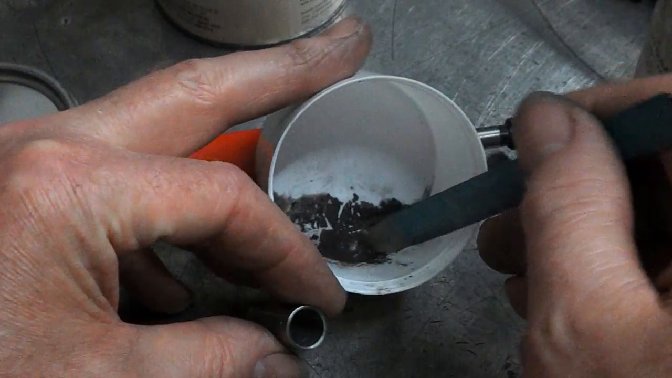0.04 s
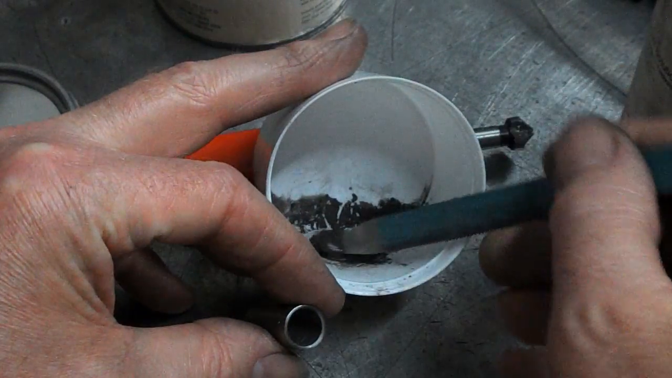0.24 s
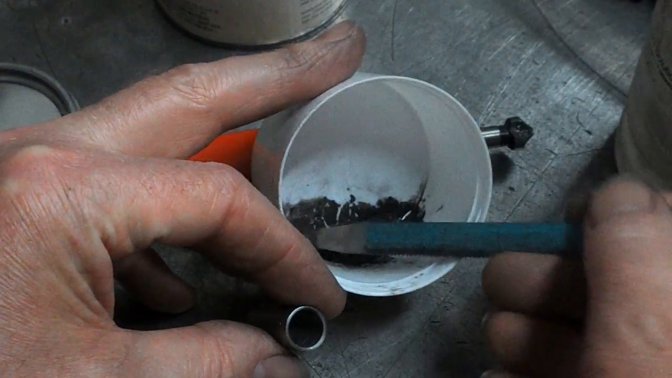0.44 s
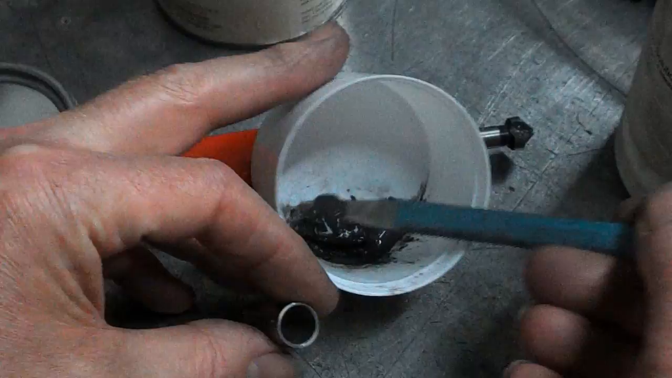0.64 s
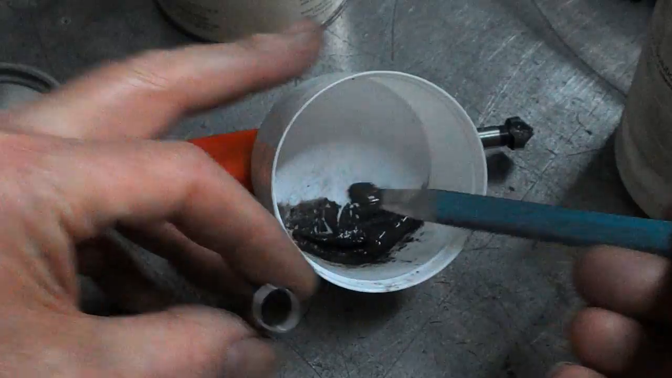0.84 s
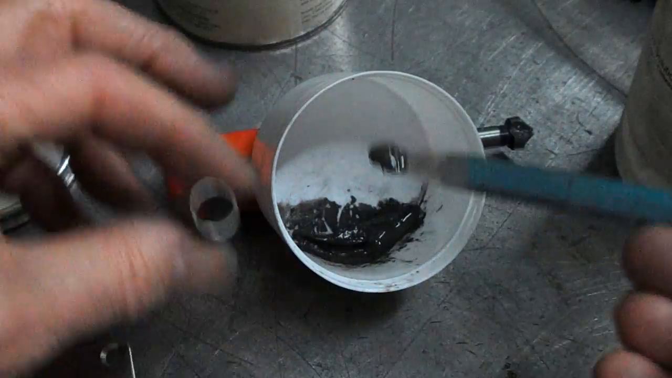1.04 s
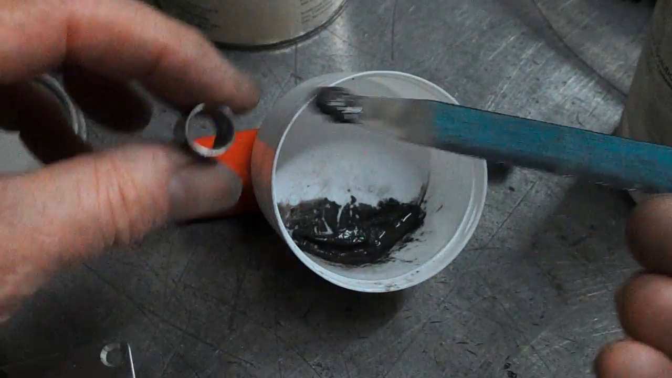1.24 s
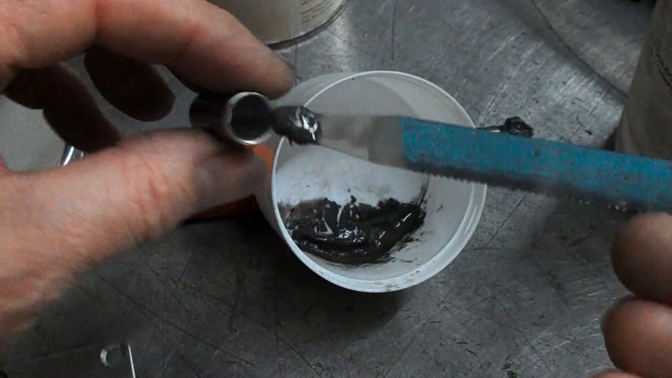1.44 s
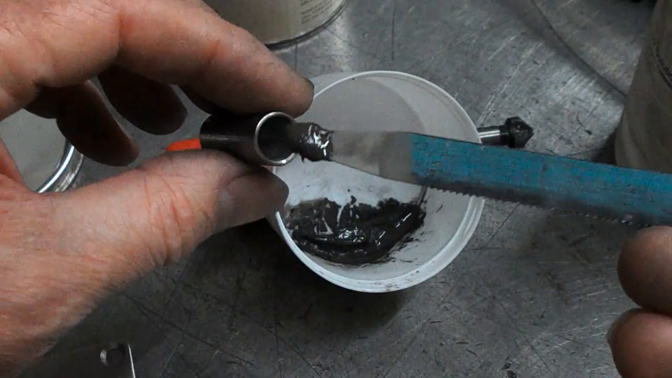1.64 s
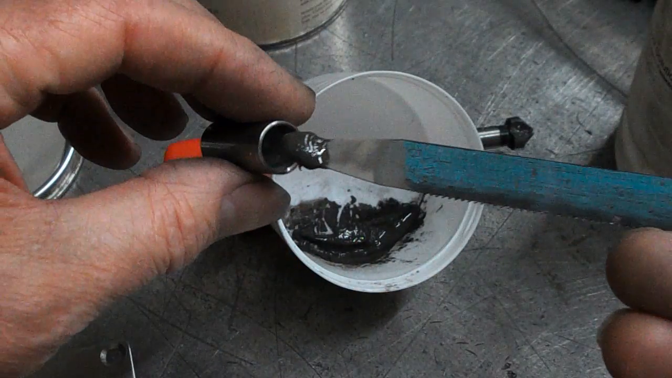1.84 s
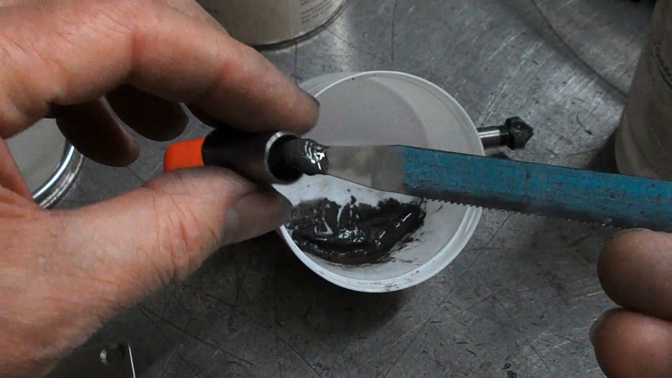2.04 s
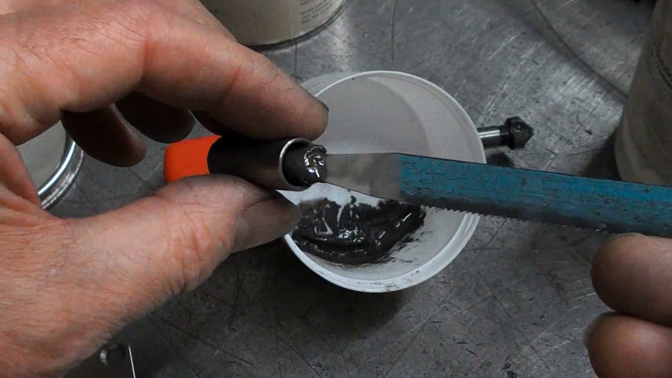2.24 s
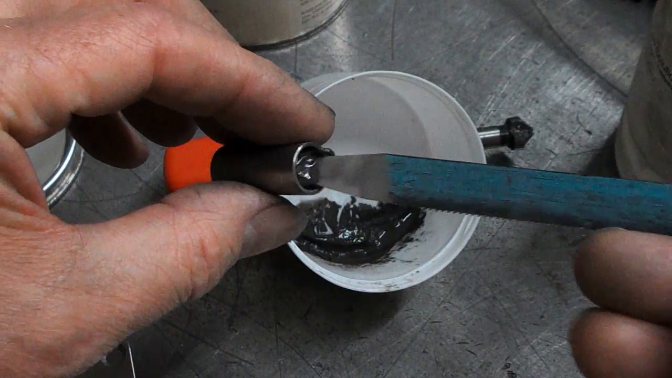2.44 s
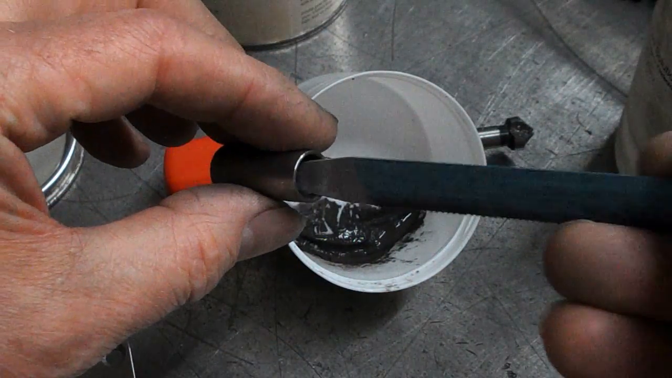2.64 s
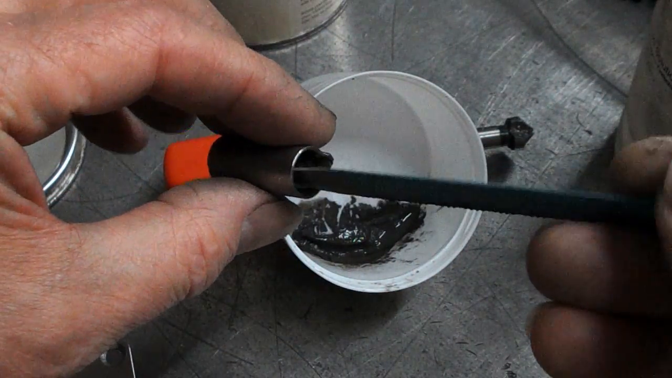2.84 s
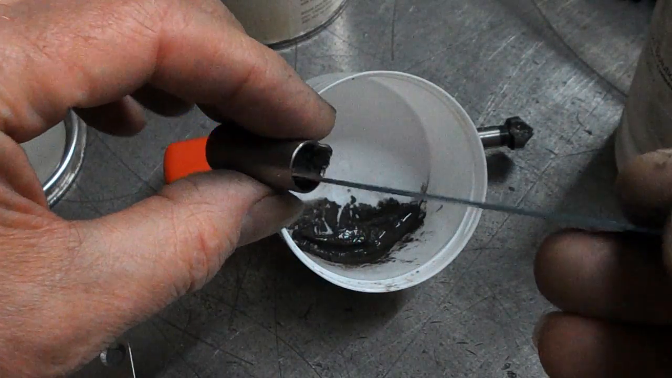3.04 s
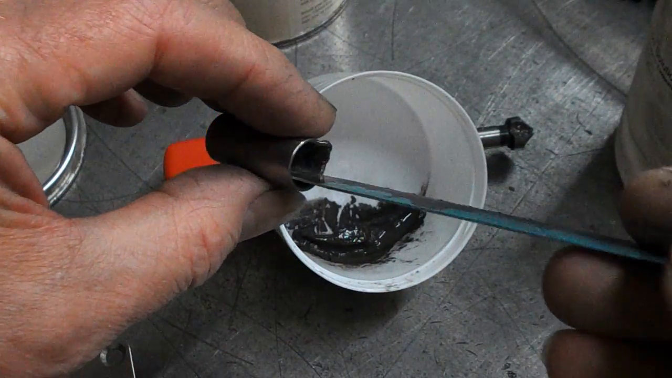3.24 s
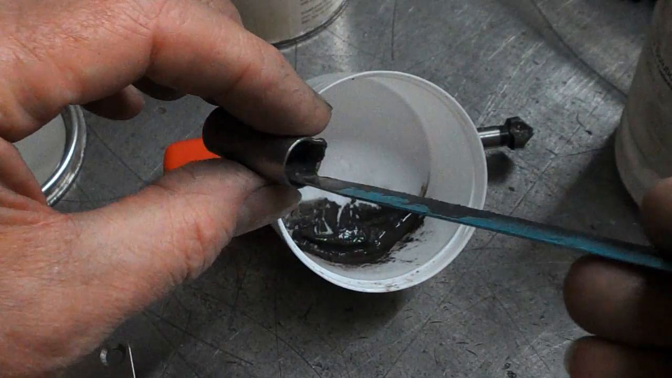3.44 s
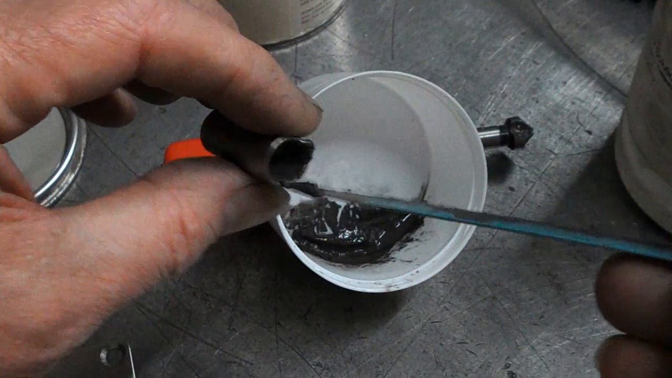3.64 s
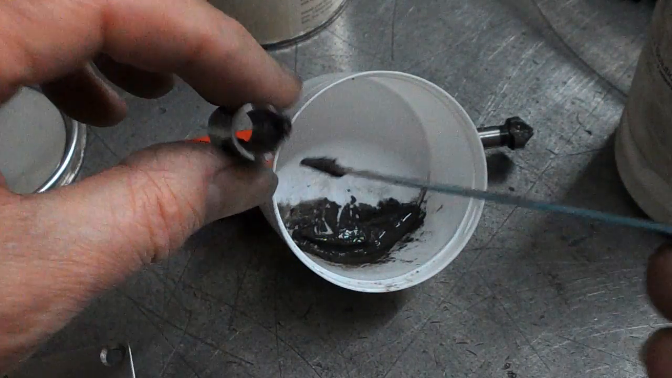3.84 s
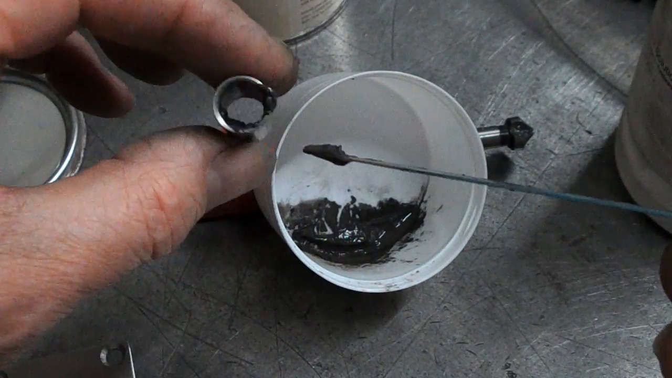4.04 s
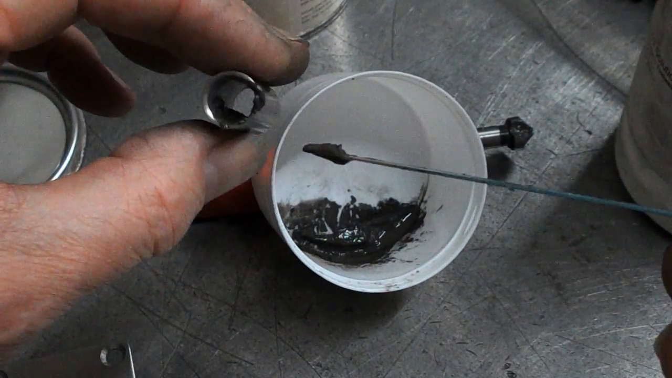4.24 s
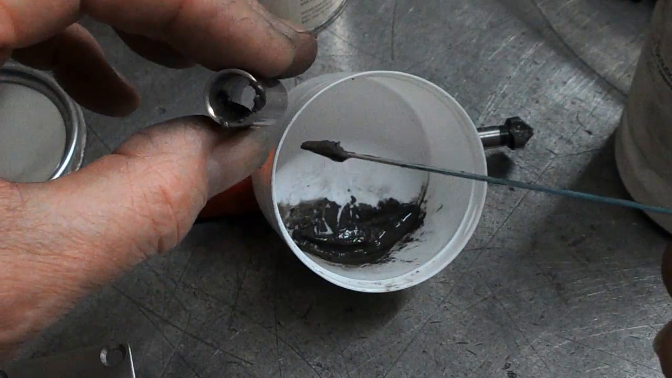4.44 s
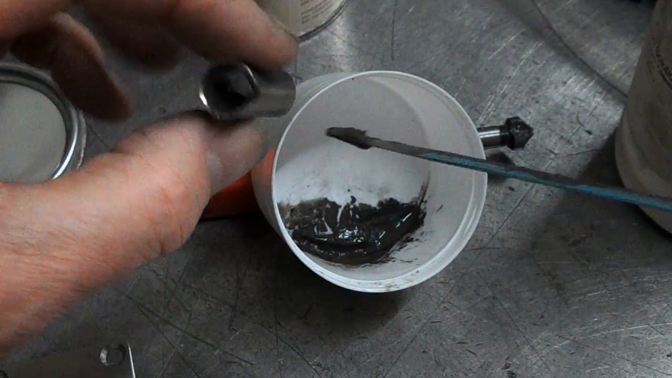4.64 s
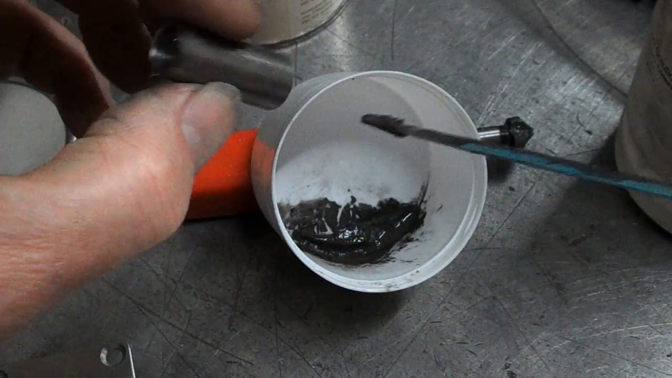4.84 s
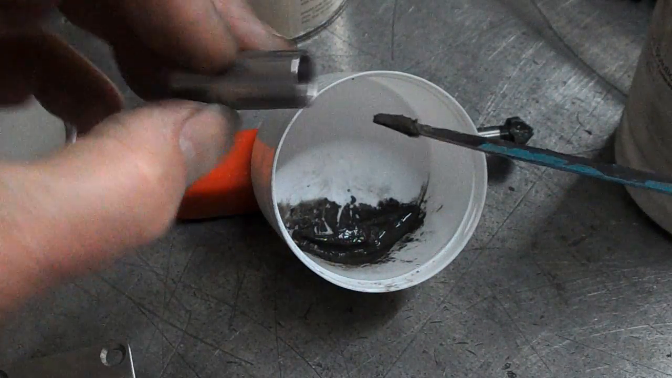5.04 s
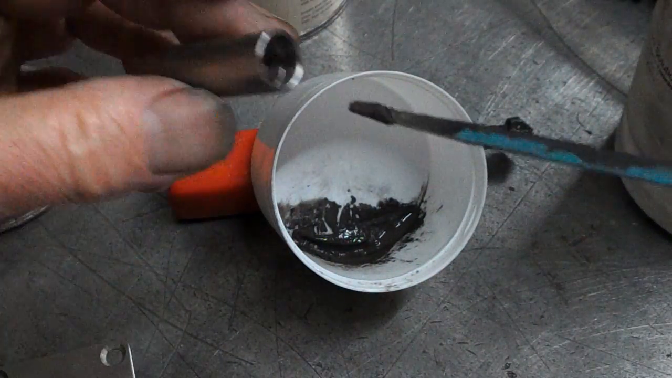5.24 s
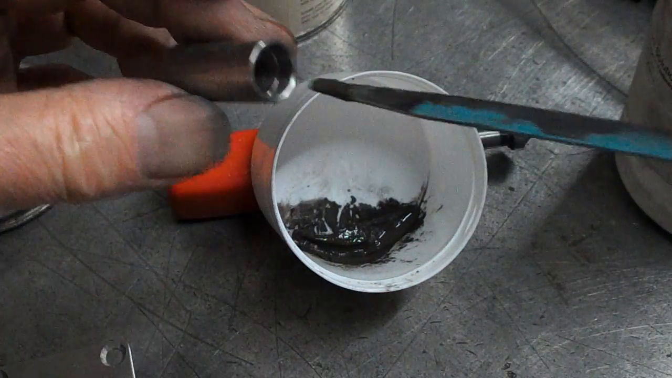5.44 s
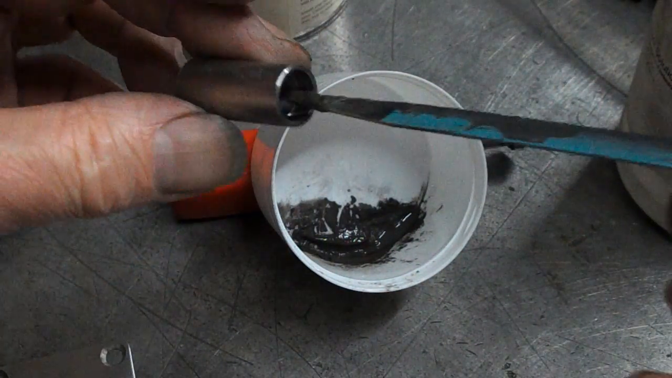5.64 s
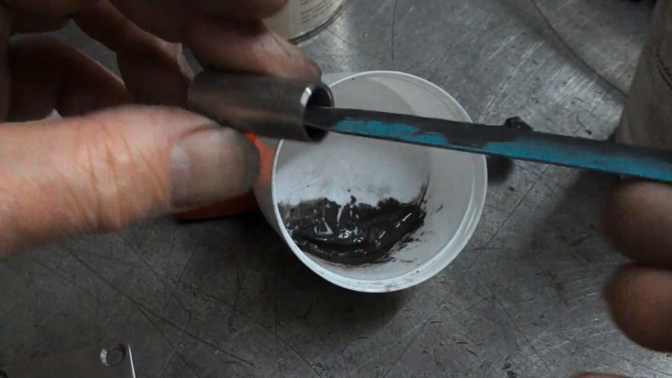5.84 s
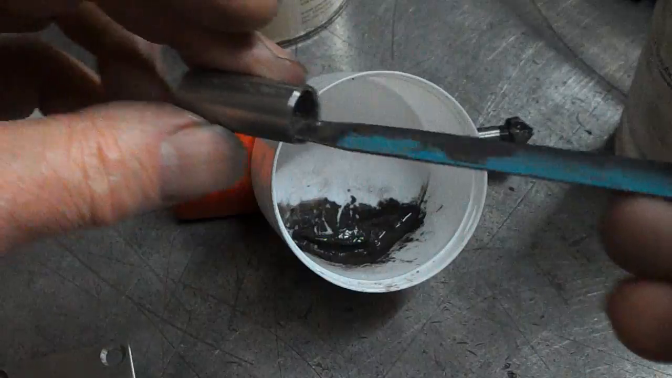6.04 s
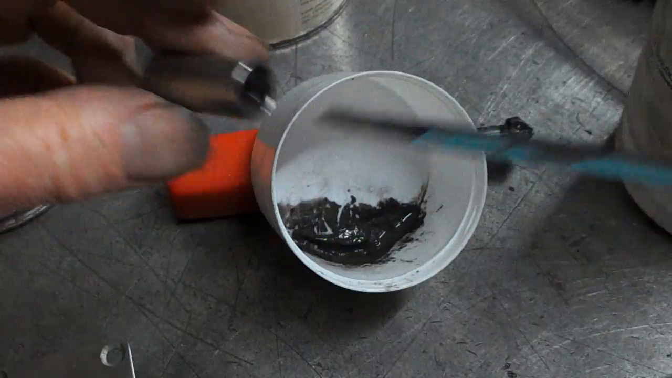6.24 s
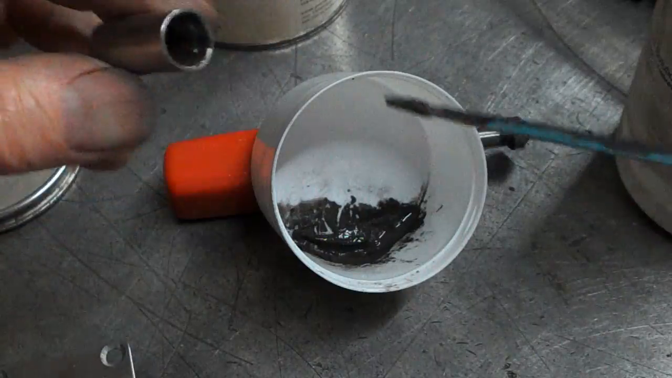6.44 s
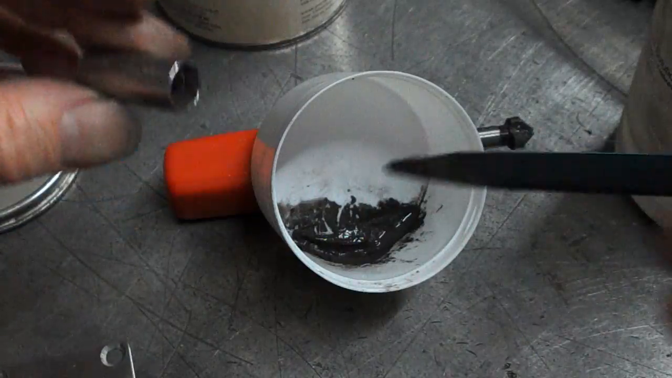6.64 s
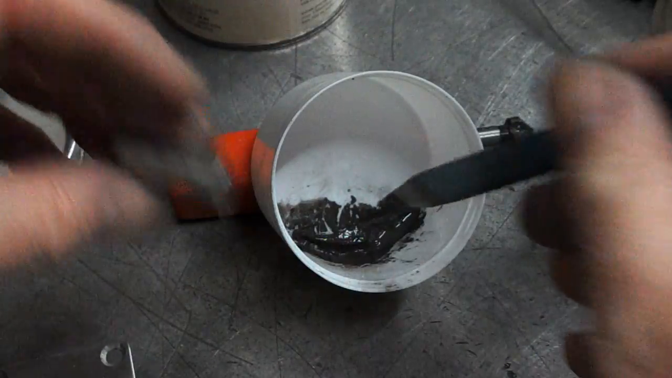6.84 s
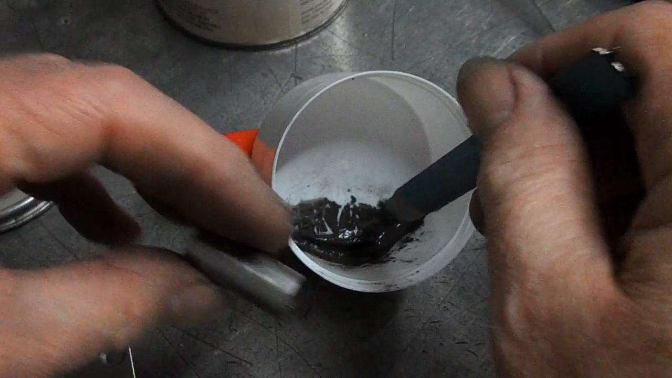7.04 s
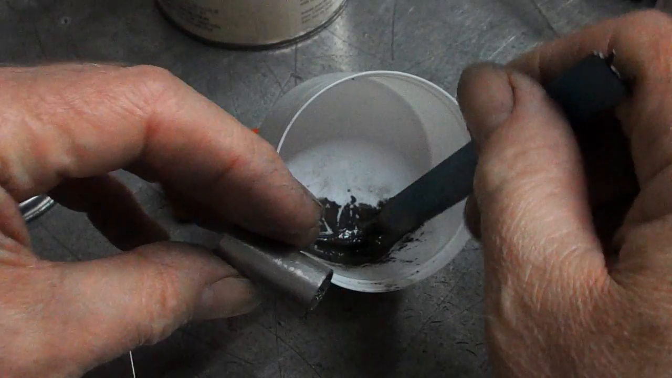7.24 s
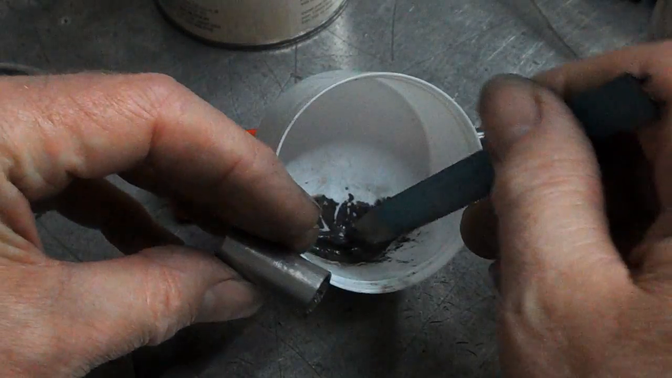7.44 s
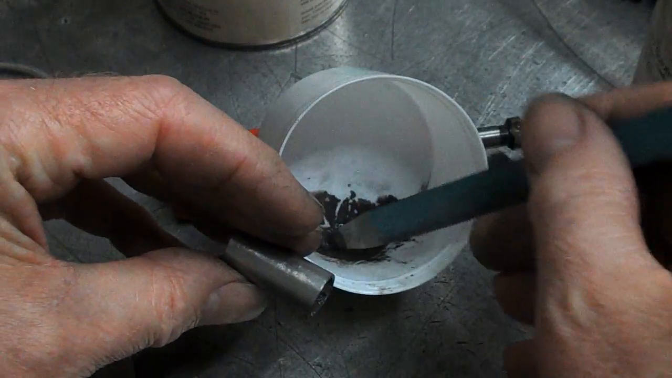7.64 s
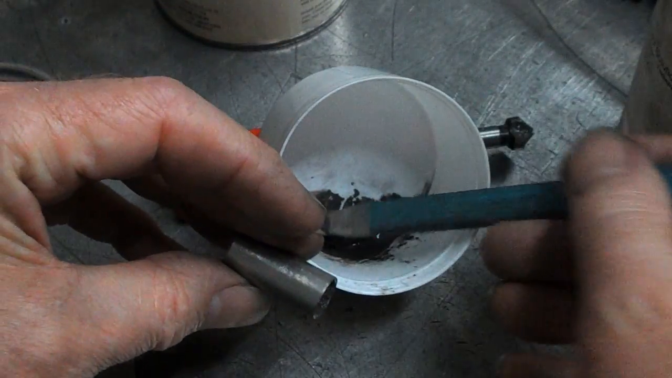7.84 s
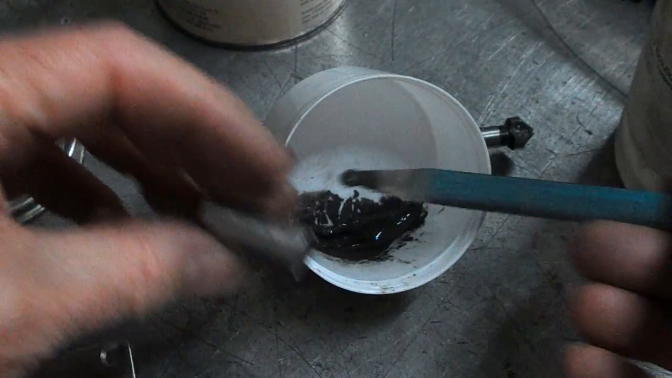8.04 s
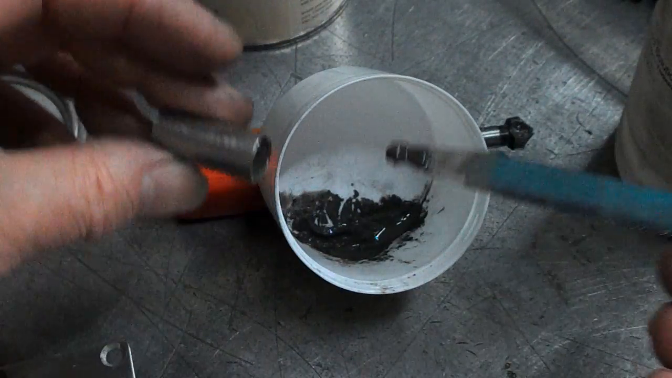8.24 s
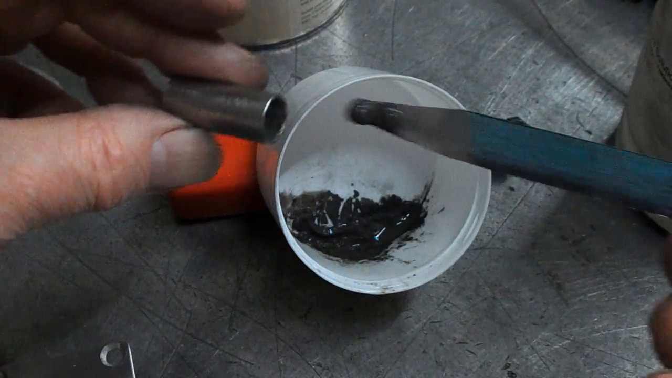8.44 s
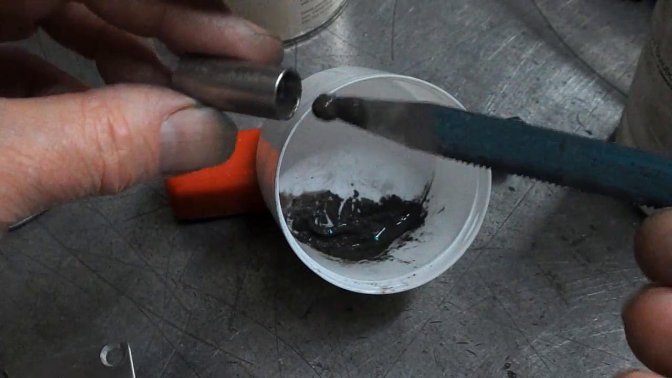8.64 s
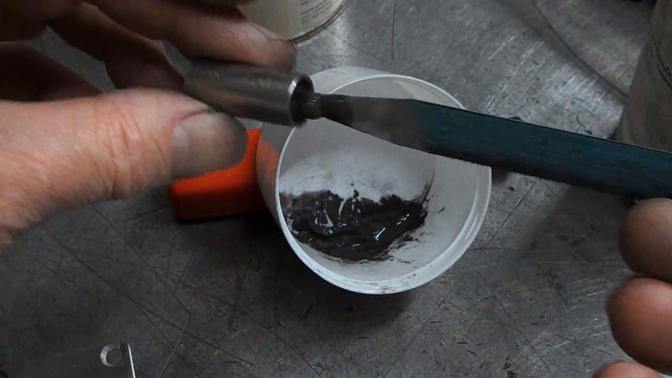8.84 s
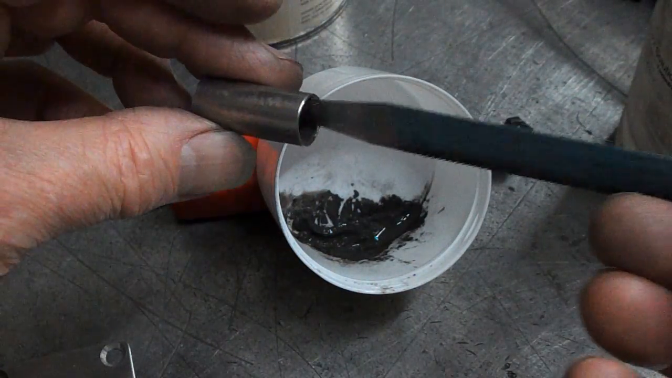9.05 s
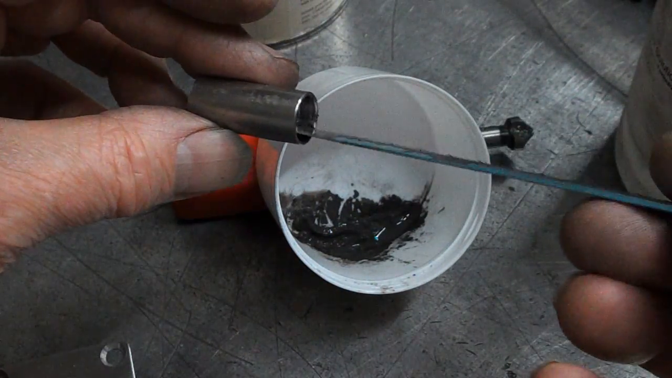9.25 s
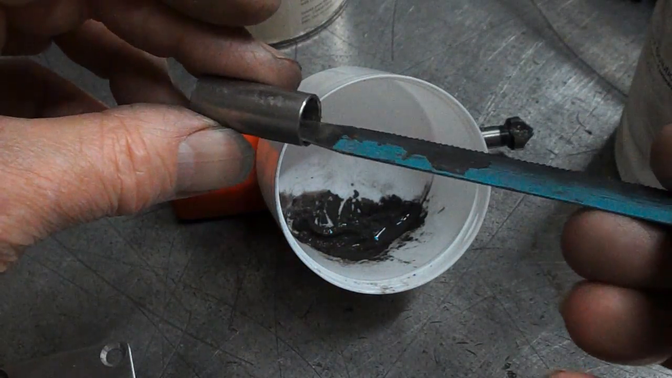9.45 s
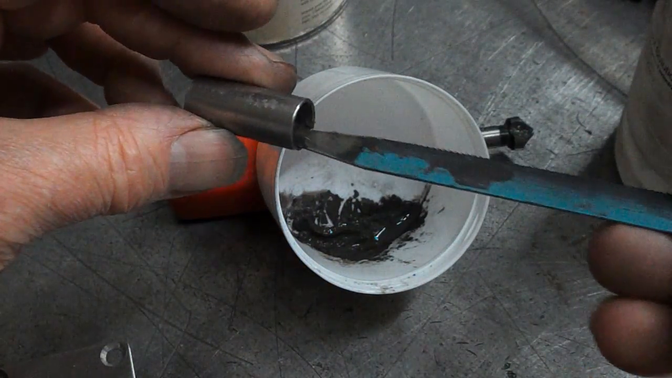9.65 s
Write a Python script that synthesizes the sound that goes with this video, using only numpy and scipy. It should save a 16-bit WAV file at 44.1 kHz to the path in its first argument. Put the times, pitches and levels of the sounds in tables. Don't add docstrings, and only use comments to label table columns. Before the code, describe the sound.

A thin steel blade scrapes gritty paste in a plastic cup, taps it, then wipes off with fine ticking rasps on a small steel tube.

```python
import sys
import numpy as np
from scipy import signal
from scipy.fft import rfft, irfft, next_fast_len
from scipy.io import wavfile
from scipy.ndimage import uniform_filter1d

SR = 44100
rng = np.random.default_rng(int(sys.argv[2]) if len(sys.argv) > 2 else 0)


def attenuation_scalar(level_db):
    decades = np.asarray(level_db, float) / 20
    return 10 ** decades


def master(y):
    cut = np.clip(np.atleast_2d(y).T, -1, 1)
    pcm = np.round(cut * 32767)
    wavfile.write(sys.argv[1], SR, pcm.astype(np.int16))


N = 427769


def unit(x):
    return x / np.sqrt(np.mean(x ** 2) + 1e-20)


def along(points, hz):
    f, v = np.transpose(points)
    return np.interp(np.log(hz + 1), np.log(f + 1), v)


def wobble(rate_hz):
    knots = rng.standard_normal(int(N * rate_hz / SR) + 2)
    return np.interp(np.arange(N) * rate_hz / SR, np.arange(len(knots)), knots)


def filtered(x, response):
    m = next_fast_len(N + 8192)
    return irfft(rfft(x, m) * response(np.fft.rfftfreq(m, 1 / SR)), m)[..., :N]


def resonance(x, hz, width_hz):
    return signal.lfilter(*signal.iirpeak(hz, hz / max(width_hz, 20), SR), x)


def resonance_twice(x, hz, width_hz):
    return resonance(resonance(x, hz, width_hz), hz, width_hz)


def camera_hiss():
    # frequency in Hz, density in dB per Hz.
    hiss_curve = [(15, -40), (25, -14), (71, -9.5), (101, -2.5), (184, -0.5), (309, -1.5), (747, -6.5),
                  (873, -7.5), (4250, -11), (5800, -10), (6950, -10), (7710, -11), (10000, -9.5),
                  (12300, -32.5), (16000, -63), (22000, -120)]
    noise = filtered(rng.standard_normal(N), lambda hz: attenuation_scalar(along(hiss_curve, hz)))
    return attenuation_scalar(-57) * unit(noise)


def circuit_whine():
    # frequency in Hz, level in dB.
    whine_tones = [(7639, -92)]
    t_s = np.arange(N) / SR
    return sum(attenuation_scalar(db - 1) * np.sin(2 * np.pi * hz * t_s) for hz, db in whine_tones)


def frame_ticks():
    # frequency in Hz, peak in dB.
    tick_modes = [(5760, -54.5), (6850, -56.5)]
    first_s, frame_rate_hz, rise_s = 0.0145, 29.99, 0.00075
    starts_s = np.arange(first_s, N / SR, 1 / frame_rate_hz)
    beats = np.zeros(N)
    beats[np.round(starts_s * SR).astype(int)] = attenuation_scalar(0.78 * rng.standard_normal(len(starts_s)))
    t_s = np.arange(SR // 100) / SR
    u = t_s / rise_s
    ring = sum(attenuation_scalar(db) * np.sin(2 * np.pi * hz * t_s) for hz, db in tick_modes)
    return signal.fftconvolve(beats, ring * u * np.exp(1 - u))[:N]


def workshop_reverb(x):
    # frequency in Hz, reverberation time t60 in seconds.
    decay_times = [(200, 0.59), (1000, 0.65), (3000, 0.074), (10000, 0.12)]
    hz, t_s, z = signal.stft(rng.standard_normal(SR // 2), SR, nperseg=256)
    decay = attenuation_scalar(-60 * t_s / along(decay_times, hz)[:, None])
    tail = signal.istft(z * decay, SR, nperseg=256)[1]
    delayed = np.pad(x, (500, 0))
    return signal.fftconvolve(delayed, tail / np.linalg.norm(tail))[:N]


def bench_thuds():
    # start in seconds, peak in dB, wall knock in dB relative to it, bench mode in Hz.
    thud_events = [
        (0.499, -28, 6.5, 474),
        (0.849, -52, -6, 460),
        (0.8768, -37, 2, 430),
        (7.5067, -33, -7, 590),
        (7.7325, -47, -12, 480),
        (7.838, -44, -4, 620),
        (8.017, -43.5, -11, 470),
    ]
    bench_width_hz, wall_hz, wall_width_hz, wall_delay_s = 480, 1300, 350, 0.0015
    out = np.zeros(N + SR)
    blow = signal.unit_impulse(SR // 10)
    for s, db, knock_db, hz in thud_events:
        push = attenuation_scalar(db + 34.5) * resonance_twice(blow, hz, bench_width_hz)
        knock = attenuation_scalar(db + knock_db + 26.0) * resonance_twice(blow, wall_hz, wall_width_hz)
        out[round(s * SR):][:len(blow)] += push
        out[round((s + wall_delay_s) * SR):][:len(blow)] += knock
    return out[:N]


def single_mode_rings():
    # start in seconds, length in seconds, frequency in Hz, level in dB.
    songs = [(0.15, .04, 8100, -46), (.8215, 0.012, 1180, -35.5), (0.843, 0.026, 720, -42.5),
             (2.9, 0.056, 9000, -63), (3.448, 0.08, 4750, -59), (3.72, 0.073, 7400, -65),
             (7.515, 0.056, 1120, -54), (0.824, 0.0083, 2460, -36), (.8095, 0.0073, 2010, -39),
             (7.535, .022, 1550, -44), (7.794, .02, 1800, -56), (9.31, .06, 3580, -66),
             (9.64, .06, 7900, -60), (.505, 0.047, 668, -53), (0.47, 0.027, 970, -54),
             (.855, 0.023, 1100, -51), (.83, .017, 3480, -51), (.895, .04, 700, -55),
             (2.3, 0.063, 6400, -59), (.343, .008, 3480, -37), (7.44, .014, 900, -53),
             (7.457, .014, 800, -49), (7.483, .014, 850, -46), (7.699, .008, 2260, -42),
             (.864, .014, 910, -56), (7.731, .016, 497, -55), (0.36, 0.035, 1100, -53),
             (0.27, 0.14, 600, -60.5), (7.83, .018, 5700, -42), (3.716, .014, 7000, -39)]
    width_hz = 77
    out = np.zeros(N + SR)
    noise = rng.standard_normal((len(songs), SR // 4))
    for (s, length_s, hz, db), drive in zip(songs, noise):
        u = np.linspace(0, 1, round(length_s * SR))
        tone = unit(resonance_twice(drive, hz, width_hz)[-len(u):])
        out[round(s * SR):][:len(u)] += attenuation_scalar(db) * tone * np.sqrt(abs(np.sin(np.pi * u)))
    return out[:N]


def touch(wall, contact, s, push_db):
    columns = np.transpose(contact)
    low_db, middle_db = [rest_db + slope * push_db for rest_db, slope in wall]
    return low_db, middle_db, np.interp(s, columns[0], columns[-1])


def by_group(db, low_db, middle_db, top_db):
    return attenuation_scalar(np.array([db + low_db, db + middle_db, db, db + top_db]))


def stroke_pressure(strokes, wall, contact):
    level_db, arch_db = -2.5, 3
    out = np.zeros((4, N + SR))
    for s, length_s, start_db, end_db, push_db in strokes:
        u = np.linspace(0, 1, max(round(length_s * SR), 2))
        db = level_db + start_db + (end_db - start_db) * u + arch_db * np.sin(np.pi * u)
        out[:, round(s * SR):][:, :len(u)] += by_group(db, *touch(wall, contact, s + length_s * u, push_db))
    return uniform_filter1d(out[:, :N], size=129)


def slip_pressure(slips, wall, contact):
    out = np.zeros((4, N + SR))
    t_ms = 1000 * np.arange(SR // 20) / SR
    for s, db, push_db, length_ms in slips:
        ramp = np.sqrt(length_ms)
        grip = t_ms / (0.64 * ramp)
        release = (1.286 * length_ms - t_ms) / (2.1 * ramp)
        shape = np.clip(np.minimum(grip, release), 0, 1)
        gains = by_group(db, *touch(wall, contact, s, push_db))
        out[:, round(s * SR):][:, :len(shape)] += gains[:, None] * shape
    return out[:, :N]


def scrape(modes, strokes, slips, taps, wall, contact, crack_db, chatter_db, grit_db, drift_db,
           favour_db, partner):
    group_edges_hz = (2700, 4900, 7650)
    # frequency in Hz, width in Hz.
    steel_click = (7600, 4600)
    rough = unit(attenuation_scalar(chatter_db * wobble(160) + grit_db * wobble(1200)))
    force = stroke_pressure(strokes, wall, contact) * rough + slip_pressure(slips, wall, contact)
    blows = np.zeros((4, N))
    for s, *levels_db in taps:
        blows[:, round(s * SR)] = by_group(*levels_db)

    hz, width_hz, db = np.transpose(modes)
    group = np.searchsorted(group_edges_hz, hz)
    coarse_s = np.arange(N)[::64] / SR
    contact_s, high, low, _ = np.transpose(contact)
    high_hz = np.interp(coarse_s, contact_s, high)
    low_hz = np.interp(coarse_s, contact_s, low)
    favoured_hz = np.array([high_hz, low_hz, partner * high_hz])
    log_distance = np.log(favoured_hz[:, None] / hz[:, None])
    near = np.exp(-(log_distance / 0.087) ** 2).max(axis=0)
    near = near * (width_hz < 600)[:, None]
    gain = attenuation_scalar(db[:, None] + favour_db * near)
    passed = gain ** 2 * width_hz[:, None]
    power = [np.sum(passed[group == g], axis=0) * np.pi / SR for g in range(4)]

    out = attenuation_scalar(crack_db) * resonance_twice(blows[3], *steel_click)
    for k, g in enumerate(group):
        share = np.repeat(gain[k] / np.sqrt(power[g]), 64)[:N]
        friction = force[g] * attenuation_scalar(drift_db * wobble(40)) * rng.standard_normal(N)
        out += resonance(share * (friction + (-1) ** k * blows[g]), hz[k], width_hz[k])
    return out


def tube_wiping():
    # frequency in Hz, width in Hz, level in dB; wide ones stand for many damped modes.
    tube_modes = [(1810, 700, -15), (3190, 200, -12.5), (4320, 170, -13), (4660, 280, -15),
                  (4200, 810, -12), (5190, 130, -4), (5670, 220, -9), (6080, 170, -1.5), (6600, 140, 1.5),
                  (7150, 390, 0.5), (6640, 1800, -5.5), (7880, 720, 1), (8220, 160, 1.5), (8620, 290, -2),
                  (9700, 220, -27), (10100, 1300, -6), (8900, 2100, -5.5)]
    # start in seconds, length in seconds, pressure at start in dB, at end in dB, wall push in dB.
    tube_strokes = [(2.238, .04, -59, -69, -15), (2.368, .1, -62, -68, -3), (2.465, 0.077, -60, -60, -5.5),
                    (2.535, 0.089, -54.5, -51.5, -7.5), (2.695, .06, -52, -65, -4),
                    (3.331, 0.036, -61, -54, -10), (3.365, 0.066, -47.5, -51.5, -7),
                    (3.446, .114, -55.5, -48.5, -16), (3.561, 0.094, -46.5, -40, -13.5),
                    (3.653, 0.075, -50, -60, -7), (5.169, .035, -59, -61, -18), (5.83, .04, -56, -73, -10),
                    (6.03, .021, -64, -56, -4), (6.049, 0.036, -49.5, -44, 0), (6.083, 0.03, -40, -52, 0),
                    (6.117, .04, -47.5, -49, -7), (6.164, 0.084, -51, -51.5, -7), (9.27, 0.16, -73, -69, 3),
                    (9.517, 0.11, -62, -54.5, -8), (9.62, 0.09, -57, -52, -11)]
    # start in seconds, pressure in dB, wall push in dB, length in ms.
    tube_slips = [(2.2515, -53, -8, 3), (2.392, -55, -6, 3), (2.4, -54, -8, 3), (2.4145, -54, -6, 2.7),
                  (2.547, -53, -8, 3), (2.5545, -53, -8, 3), (2.9785, -49.5, 0, 3.2), (3.5375, -50, -12, 3),
                  (3.626, -42, -12, 4), (3.648, -46, -10, 3), (3.676, -54, -10, 2.8),
                  (3.7115, -45, -10, 2.5), (3.469, -49, -1, 3.4), (3.5128, -43, -15, 2.2),
                  (3.533, -52, -13, 3.7), (3.567, -45, -19, 2.8), (3.635, -42, -6, 6.2),
                  (3.689, -40, -12, 3), (3.707, -48, -6, 3.3), (3.7148, -37.5, -9, 7),
                  (3.7238, -38.5, -7, 5.2), (5.81, -47, -5.5, 14), (5.819, -45, -5, 3),
                  (5.8295, -47, -8, 3), (6.082, -47, 2, 4), (6.099, -46, -3, 3), (6.125, -43, -10, 4.7),
                  (6.134, -42, -14, 3.7), (6.139, -47, -18, 3.7), (6.147, -45, -14, 2.2),
                  (6.151, -41, -14, 2.5), (6.157, -41, -14, 2.2), (6.1665, -48, -12, 2.2),
                  (6.1885, -44, -14, 2.5), (6.173, -42, -12, 3), (6.225, -50, -12, 3.6),
                  (6.181, -45, -12, 5.5), (6.193, -48, -14, 4), (6.2, -42.5, -18, 12),
                  (6.213, -47, -16, 4.5), (6.236, -36.5, -22, 10.5), (9.45, -52, -2, 3),
                  (9.596, -48, -12, 4.5), (9.561, -57, -12, 3), (9.613, -48, -14, 4),
                  (9.639, -53, -12, 2.8), (9.652, -50, -14, 2.2), (9.66, -50, -13, 3.2),
                  (9.669, -49, -14, 2.3), (9.6775, -55, -14, 5.5)]
    # start in seconds, strength in dB.
    tooth_ticks = [(2.481, -28), (2.4932, -25), (2.5625, -33), (2.5912, -25), (2.611, -26), (2.6981, -27.5),
                   (2.9795, -31), (3.3771, -30), (3.5132, -21), (3.5695, -30), (3.5754, -16), (3.582, -16),
                   (3.5946, -20), (3.5971, -19), (3.6005, -22), (3.6068, -18), (3.6114, -16), (3.62, -19),
                   (3.636, -25), (3.6386, -17), (3.6425, -25), (3.681, -29), (5.8445, -29), (6.1477, -25),
                   (6.1522, -23), (6.1593, -28), (6.1673, -31), (6.1895, -29), (9.6093, -18), (9.6528, -32)]
    # level at no push in dB, lift in dB per dB of push.
    tube_wall = [(-21.5, 0.01), (0.1, 0.97)]
    # time in seconds, favoured high mode in Hz, favoured low mode in Hz, edge sharpness in dB.
    tube_contact = [(2.38, 5670, 5460, -5), (2.47, 8300, 5400, -3), (2.58, 6400, 5200, -4.5),
                    (2.72, 5500, 5170, -10), (3.37, 6140, 4950, -5), (3.47, 7150, 4670, 1.5),
                    (3.575, 7240, 4700, -1.5), (3.61, 7300, 5030, 0), (3.65, 7160, 4320, -5.5),
                    (3.68, 6100, 4320, 0), (3.7, 8100, 6100, 2), (3.73, 7900, 6070, 0.5),
                    (5.83, 6770, 4320, -5), (6.09, 6240, 4600, -7), (6.14, 6800, 4670, 2.5),
                    (6.165, 8200, 4670, 6), (6.235, 6600, 4320, 4), (9.45, 5910, 5480, -8),
                    (9.54, 8500, 7000, -2), (9.61, 8550, 5170, -0.5), (9.63, 8500, 7000, 3.5),
                    (9.7, 8600, 7000, 2)]
    graze_db = -14
    taps = [(s, db, *touch(tube_wall, tube_contact, s, graze_db)) for s, db in tooth_ticks]
    return scrape(tube_modes, tube_strokes, tube_slips, taps, tube_wall, tube_contact, crack_db=9,
                  chatter_db=0.5, grit_db=2.0, drift_db=2.5, favour_db=12, partner=0.87)


def cup_scraping():
    # frequency in Hz, width in Hz, level in dB; wide ones stand for many damped modes.
    cup_modes = [(706, 130, -8.5), (836, 100, -1.5), (1127, 115, -4), (1280, 83, -7), (1500, 85, -2),
                 (2300, 150, -1.5), (1400, 1170, -11), (1950, 220, -10.5), (3460, 89, 0), (4180, 250, -5.5),
                 (3540, 2500, -7), (5400, 190, -0.5), (6130, 290, -3.5), (6720, 160, 1), (7070, 130, -0.5),
                 (6300, 2200, -7), (8300, 550, -1), (9080, 150, -1), (9600, 1800, -7), (9000, 2600, -18)]
    # start in seconds, length in seconds, pressure at start in dB, at end in dB, wall push in dB.
    cup_strokes = [(0, 0.029, -45.5, -56, -0.5), (0.027, 0.04, -50.5, -54, 0.5),
                   (0.064, 0.041, -66, -65, 4), (.105, 0.065, -45.5, -38.5, -5.5),
                   (0.173, 0.065, -45, -53.5, -5.5), (0.237, 0.11, -47.5, -41, -3),
                   (0.348, 0.026, -41.5, -50, -4), (0.376, 0.039, -51, -45, -1.5),
                   (0.407, 0.061, -39.5, -36, -10.5), (0.468, 0.056, -43, -52.5, -5),
                   (0.529, 0.047, -61, -60, 4.5), (0.578, 0.055, -48, -55, -18),
                   (0.637, 0.029, -59, -55, -2), (0.824, 0.17, -57.5, -81.5, 12.5),
                   (7.437, 0.067, -53.5, -56.5, 5), (7.501, 0.06, -55, -53.5, 7),
                   (7.564, 0.021, -59, -52, 0), (7.599, 0.094, -53, -75, 3), (7.7, 0.12, -59, -50.5, -3),
                   (7.848, 0.051, -56, -59, -1), (7.9, 0.083, -71, -60.5, 2.5)]
    # start in seconds, pressure in dB, wall push in dB, length in ms.
    cup_slips = [(.058, -47, -1, 4.4), (.112, -39.5, -16, 7.1), (0.14, -52, -8, 8.4), (.165, -45, -13, 4.8),
                 (0.176, -47, -8, 3), (.038, -54, -3, 5.6), (0.171, -40, -8, 3), (.2185, -50, -5, 3),
                 (.2255, -48, -5, 3), (.232, -45, -5, 3), (.2415, -47, -8, 4.3), (.262, -48, -4, 12),
                 (0.278, -53, 6, 4.3), (0.3, -45, -10, 2.7), (.3225, -45, -10, 4), (.36, -44, -10, 3),
                 (.366, -45, -11, 4), (0.377, -46, -2, 3.5), (.343, -45, -14, 5.9), (0.353, -38, -14, 2.6),
                 (.358, -53, 3, 16), (.375, -47, 6, 4.5), (0.385, -47, -5, 9), (0.414, -34, -22, 3.2),
                 (.438, -39, -17, 3), (.519, -48, -9, 9.8), (.646, -54.5, -7.5, 13.5), (7.437, -45, 0, 3.9),
                 (7.442, -52, 0, 9), (7.465, -48, 3, 6), (7.484, -59, 9, 6), (7.525, -54, -1, 9),
                 (7.544, -52, 6, 9.6), (7.556, -53, 10, 7.5), (7.565, -46, -4, 3), (7.573, -45, -1.5, 2.4),
                 (7.587, -43.5, -3.5, 16), (7.596, -44, -11, 2.4), (7.63, -52, -10, 5.4),
                 (7.7, -42, -12, 5.1), (7.767, -59, -11, 4.2), (7.731, -51, -21, 8.3),
                 (7.796, -49.5, -3, 12.6), (7.822, -43, -5, 9.1), (7.83, -39.5, -12.5, 14.6)]
    # start in seconds, upper modes in dB, then low, middle, top in dB relative.
    cup_taps = [(.4089, -12, -5, -2, -0.5), (.8112, -25, 13, 2, -6), (.8124, -25.5, 9, 2, -8),
                (0.8233, -15.5, 2.5, -5, -15), (0.8278, -17.5, 12, -9, -9), (.8291, -15, 5.5, 3, -4),
                (7.6995, -23, -1, 2, -0.5), (7.8335, -15.5, -13, -5, -4), (7.84, -20, -8, -6, -6),
                (.0585, -22.5, -3, -2, -4), (.1668, -19, -18, -4, 2), (.4398, -14, -13, -8, -4),
                (8.0503, -39, 7, 7, -6)]
    # level at no push in dB, lift in dB per dB of push.
    cup_wall = [(-1.06, 1), (-0.5, 0.29)]
    # time in seconds, favoured high mode in Hz, favoured low mode in Hz, edge sharpness in dB.
    cup_contact = [(0, 6800, 2300, -6), (.13, 7360, 1500, -1), (.2, 5630, 1500, -7),
                   (.26, 8300, 1110, -4.5), (.3, 6100, 1260, -9), (.345, 6000, 1100, -9),
                   (.37, 5970, 1200, -12), (.44, 6530, 1500, -6), (.49, 5650, 3460, -1),
                   (.53, 6300, 1280, -3), (.56, 6300, 1280, -2), (.6, 6560, 3460, 5),
                   (.66, 9050, 3460, -0.5), (7.437, 5300, 1500, -5), (7.457, 6500, 800, -3),
                   (7.5, 6000, 865, -8), (7.52, 6540, 2300, -2), (7.545, 6460, 1300, -2),
                   (7.6, 5230, 1140, -7), (7.72, 5300, 2290, -5), (7.76, 6000, 4180, -4),
                   (7.79, 6000, 2200, -9), (7.835, 5900, 1100, -9), (7.9, 5500, 830, -15)]
    # seconds, high Hz, low Hz, sharpness in dB.
    tap_contact = [
        (0.813, 5500, 840, -10.5),
        (.823, 5300, 1150, -10.5),
        (.829, 5800, 860, -10.5),
        (.85, 5500, 710, -10.5),
        (.95, 7000, 790, -10.5),
    ]
    contact = sorted([*cup_contact, *tap_contact])
    return scrape(cup_modes, cup_strokes, cup_slips, cup_taps, cup_wall, contact, crack_db=0,
                  chatter_db=-0.5, grit_db=2.5, drift_db=3.0, favour_db=7.5, partner=0.59)


def scene():
    tube = tube_wiping()
    cup = cup_scraping()
    bench = cup + tube + bench_thuds()
    room = attenuation_scalar(-16.5) * workshop_reverb(bench - 0.38 * tube)
    return (bench + room + frame_ticks() + single_mode_rings())[None]


def microphone_notch(x):
    notch_hz = (7650, 41, 350)
    centre, zero, pole = notch_hz
    top_hz, slope_hz = 12440, 300

    def response(f):
        detune = centre * centre - f * f
        band = np.clip((top_hz - f) / slope_hz, 0, 1)
        return (detune + 1j * f * zero) / (detune + 1j * f * pole) * band

    return filtered(x, response)


def low_pass(x):
    return signal.sosfilt(signal.butter(12, 12550, fs=SR, output="sos"), x)


def record(dry):
    # frequency in Hz, gain in dB.
    mic_top = [(100, -0.5), (9500, 0), (10500, -3), (11500, -11.5), (12300, -19), (12600, -70)]
    heard = filtered(dry, lambda hz: attenuation_scalar(along(mic_top, hz))) + camera_hiss()
    mix = microphone_notch(heard) + circuit_whine()
    return low_pass(mix)


dry = scene()
out = record(dry)
master(out)
```